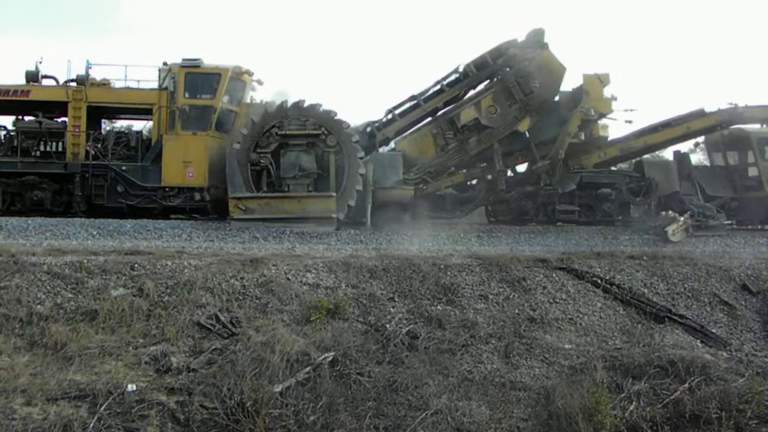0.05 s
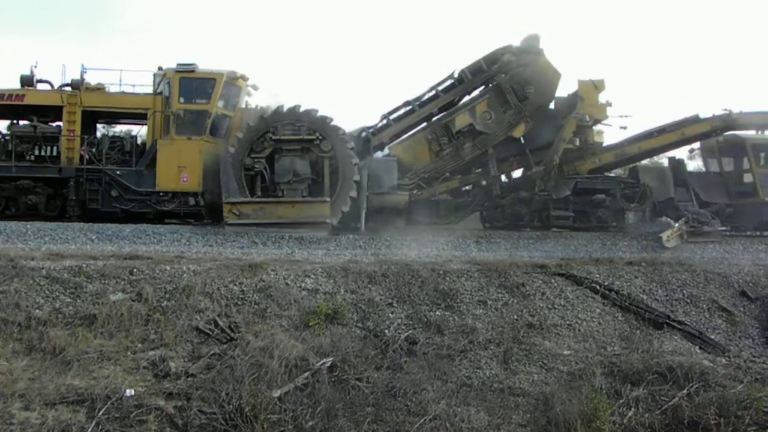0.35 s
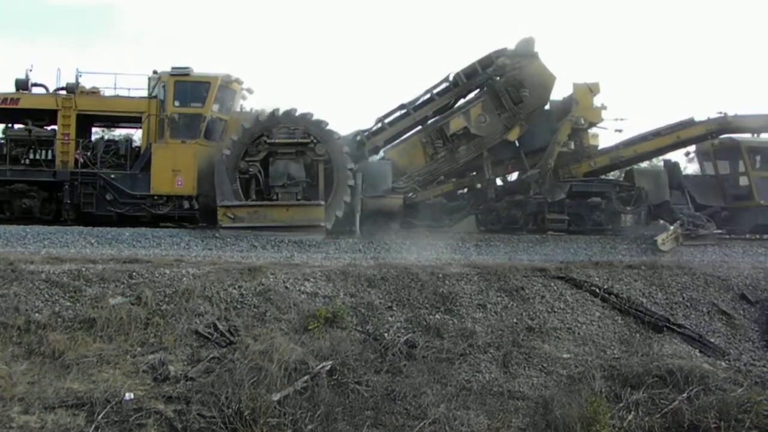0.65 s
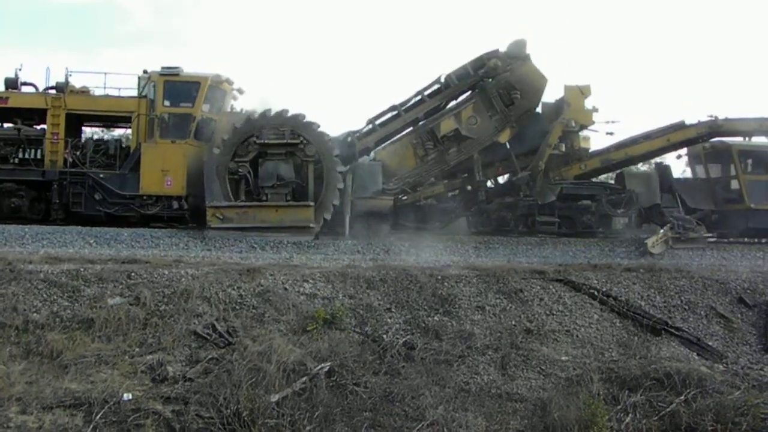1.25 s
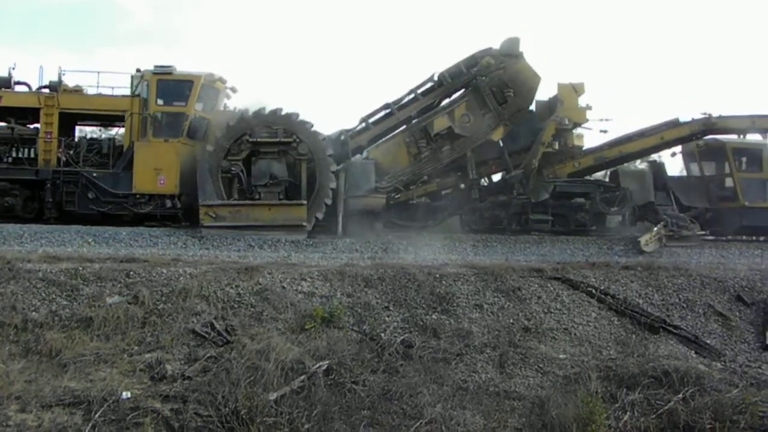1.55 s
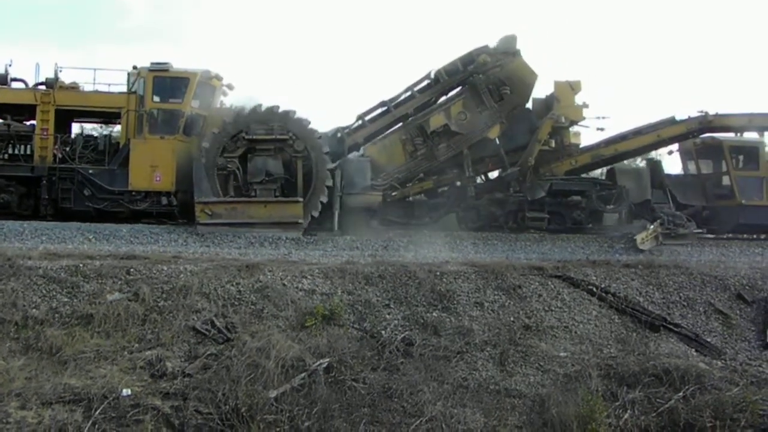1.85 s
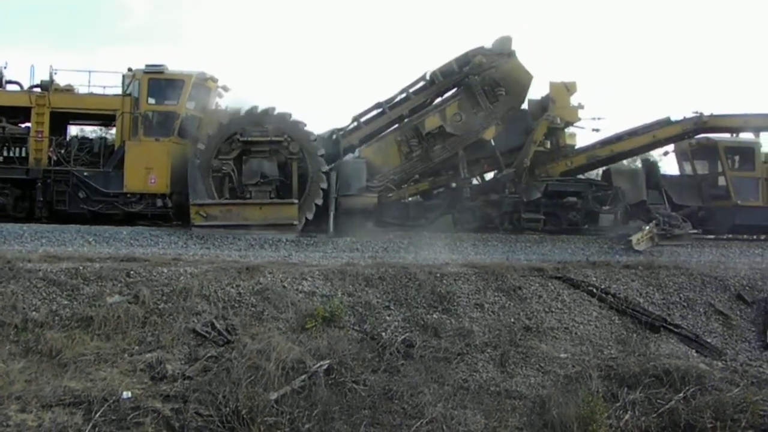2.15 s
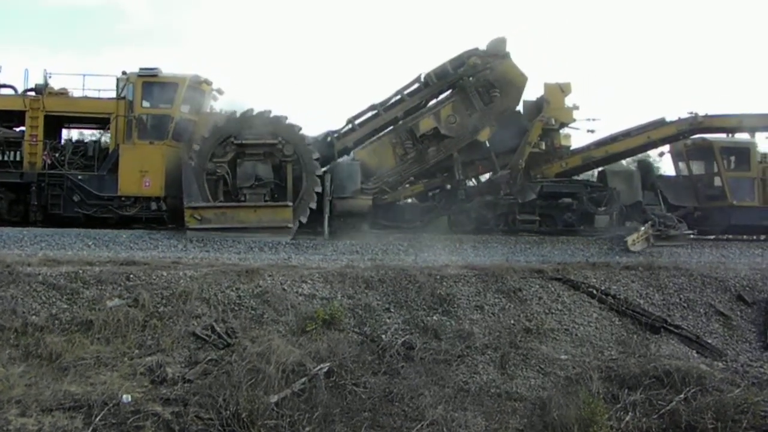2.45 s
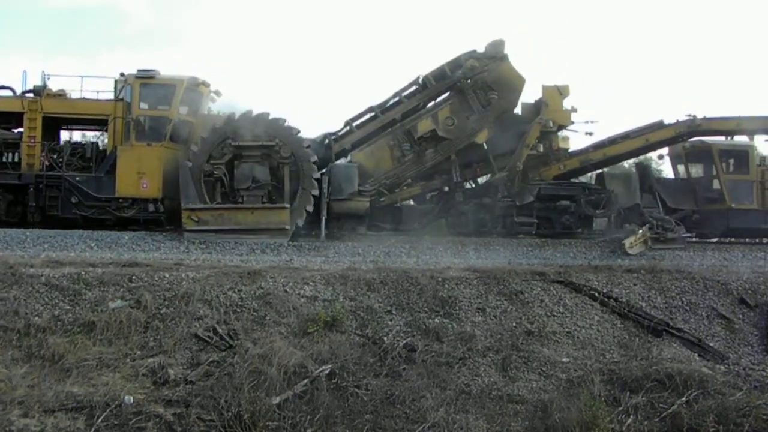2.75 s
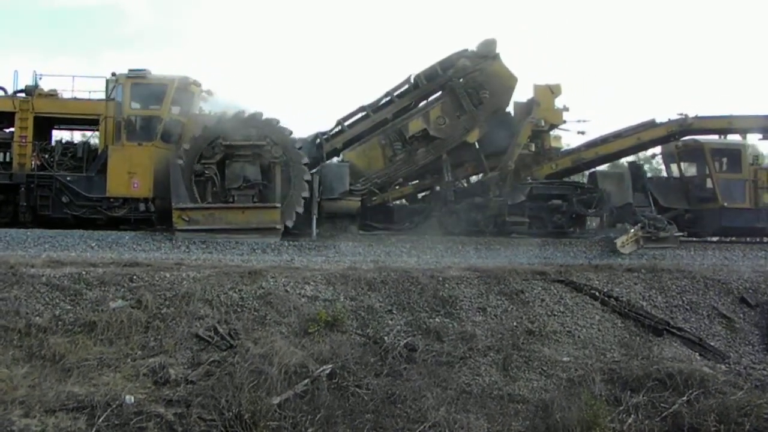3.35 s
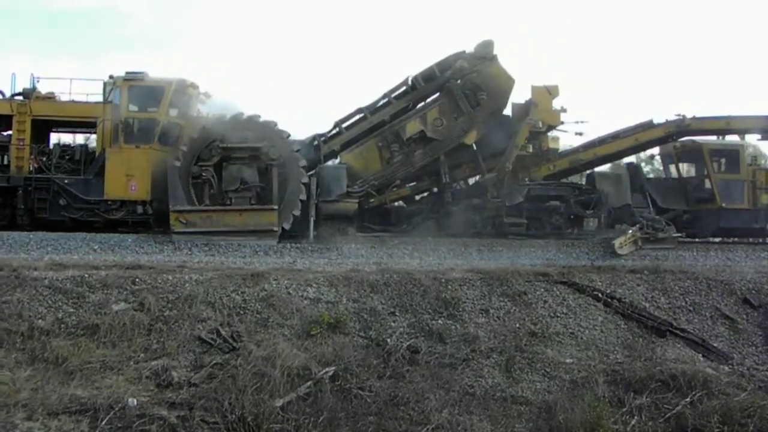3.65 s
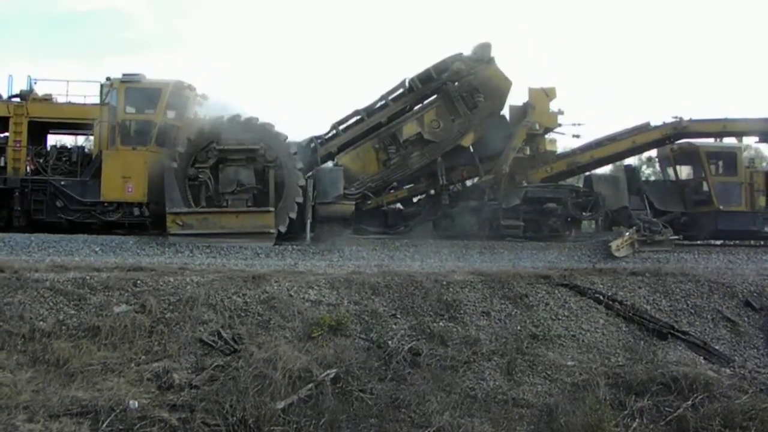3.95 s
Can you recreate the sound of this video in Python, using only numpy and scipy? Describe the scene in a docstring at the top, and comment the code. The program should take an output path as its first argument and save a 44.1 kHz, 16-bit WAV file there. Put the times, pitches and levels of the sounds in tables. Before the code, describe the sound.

A large track maintenance machine roars throughout, heard outdoors from a distance, with crushed stone rattling in rapid pulses over diesel rumble and a thin whine. Stones thud and clatter on steel at irregular moments. A sharp metal squeak cuts through at about 0.3 seconds, a few lower squeaks follow around 3 seconds, and faint, very high ones come and go. The machine keeps running through 4 seconds.

```python
"""A railway bank, heard from across a field, where a ballast cleaner is at work.
Diesels rumble, drives whine and conveyors roar, while a screen shakes crushed stone about
sixteen times a second into a pulsing rattle. On top, big stones thud and clatter on the steel,
and dry metal squeaks now and then as it sticks and slips."""
import sys
import numpy as np
from scipy import signal
from scipy.fft import rfft, irfft
from scipy.io import wavfile

SR = 44100
rng = np.random.default_rng(int(sys.argv[2]) if len(sys.argv) > 2 else 0)


def output_pcm(signal):
    """Save a mono or channel-first signal as 16-bit PCM at the path in sys.argv[1].

    Samples are clipped to [-1, 1] before scaling.
    """
    pcm = np.clip(np.atleast_2d(signal).T, -1, 1) * 32767
    wavfile.write(sys.argv[1], SR, np.round(pcm).astype(np.int16))


N = 176400
TIME = np.arange(N) / SR

# Tone of the diesel rumble: frequency_hz, level_db
DIESEL_SPECTRUM = [(15, -92), (35, -91), (55, -73), (84, -65), (108, -68.5), (145, -68.5), (170, -77),
                   (193, -101), (230, -79.5), (330, -82.5), (600, -88)]
# Swells and dips of that rumble: time_s, gain_db
DIESEL_SWELLS = [(0, -3), (.24, 5.5), (.36, -2.5), (1.05, 0), (1.25, -5), (1.58, 5), (1.66, -8), (1.73, 5),
                 (1.8, -4), (2.24, 2), (2.31, 5), (2.38, -9), (2.57, 1), (3.2, -1), (3.4, -7), (3.7, -1),
                 (4, -3)]
# Tone of the far-off low bed: frequency_hz, level_db
BED_SPECTRUM = [(15, -90), (170, -86), (198, -88), (225, -74), (270, -69), (330, -74.5), (600, -97)]
# Whining gears and pumps: pitch_hz, level_db, waver_hz
DRIVE_WHINES = [(246.6, -64, 3.05), (409.4, -46, 2.6), (923, -46, 2.7), (1725, -46, 3.5), (1837, -55, 4.2),
                (2300, -46, 3.2)]
# Tone of the conveyor roar: frequency_hz, level_db
CONVEYOR_SPECTRUM = [(220, -100), (335, -73), (385, -61), (470, -59.5), (620, -61.5), (750, -63),
                     (950, -59), (1130, -63.5), (1330, -61), (1500, -63.5), (1800, -61.5), (2300, -64),
                     (4000, -64), (8000, -78), (16000, -100)]
# Slow heave of that roar: time_s, gain_db
CONVEYOR_SWELLS = [(0, 2.5), (.2, 0), (.9, -0.3), (1.2, .6), (1.48, 1), (1.7, -0.5), (2.1, 0.2), (2.7, -.5),
                   (3.05, -1.4), (3.55, -0.5), (4, -0.1)]
# Tone of crushed stone on the screen: frequency_hz, level_db
STONE_SPECTRUM = [(300, -80), (1000, -69.5), (2300, -63), (2700, -58.5), (3050, -57.5), (3500, -60.5),
                  (4200, -60), (5000, -57.5), (5900, -55.5), (6800, -56), (8600, -63), (9700, -69),
                  (12000, -74.5), (13500, -80.5), (15700, -85)]
# Loads of stone hitting steel: peak_s, centre_hz, width_octaves, level_db, swell_s
STONE_HITS = [(.31, 565, 0.68, -28, 0.028), (.574, 2350, 0.29, -23, 0.0087), (.578, 5000, .7, -22, .012),
              (0.767, 5800, .5, -24, 0.027), (0.837, 2840, .2, -24.5, 0.0083),
              (1.232, 960, 0.13, -28, 0.0078), (1.531, 3130, 0.14, -24, 0.0072),
              (1.557, 620, 0.93, -30.5, 0.023), (1.96, 720, 0.86, -30, 0.026),
              (2.246, 467, 0.56, -27.5, 0.017), (2.355, 5500, 0.33, -23.5, 0.0065),
              (2.685, 5200, .5, -19, .011), (3.24, 800, 0.85, -30, 0.038), (3.318, 5560, 0.45, -17, 0.0038),
              (3.892, 700, 0.36, -30.5, .022)]
# Dry metal squeaks: start_s, length_s, pitch_hz, level_db, glide_ratio (pitch change over pitch)
METAL_SQUEAKS = [(0.318, 0.031, 6610, -6.5, .012), (.445, .035, 12550, -35, 0), (.705, .03, 12450, -37, 0),
                 (.755, .04, 13100, -30, -.025), (1.015, .025, 13500, -41, 0), (2.33, .03, 11850, -33, 0),
                 (2.85, 0.081, 3100, -24, -.005), (2.91, 0.12, 3020, -27.5, -.015),
                 (3.056, 0.056, 2690, -23.5, -0.006), (3.28, .03, 13820, -36, 0),
                 (3.574, .028, 12000, -25, -0.0073), (3.908, 0.032, 13280, -30, -.01),
                 (3.972, .05, 13550, -28, .05)]


def amp(db):
    """Decibels to gain."""
    return 10 ** (np.asarray(db) / 20)


def unit(x):
    """Scales to rms 1."""
    return x / np.sqrt(np.mean(x ** 2) + 1e-20)


def fader(points):
    """Rides the gain along points of time_s, gain_db."""
    return amp(np.interp(TIME, *np.transpose(points)))


def colour(x, spectrum):
    """Gives white sound of rms 1 a spectrum in dB per Hz."""
    hz, db = np.transpose(spectrum)
    curve_db = np.interp(np.log(np.fft.rfftfreq(N, 1 / SR) + 1), np.log(hz), db)
    return irfft(rfft(x) * amp(curve_db), N) * np.sqrt(SR / 2)


def drift(rate_hz):
    """Random wander of rms 1, mostly slower than rate_hz."""
    rolloff = 1 + (np.fft.rfftfreq(N, 1 / SR) / rate_hz) ** 4
    return unit(irfft(rfft(rng.standard_normal(N)) / rolloff, N))


def patchy_noise(patch_db, patch_hz, patch_s):
    """White noise that swells in random patches of time and pitch."""
    frames = signal.stft(rng.standard_normal(N), nperseg=512, noverlap=384)[2]
    across_pitch = np.fft.fftfreq(frames.shape[0], SR / 512)[:, None]
    along_time = np.fft.fftfreq(frames.shape[1], 128 / SR)
    blur = np.exp(-(across_pitch * patch_hz) ** 2 - (along_time * patch_s) ** 2)
    patches = np.fft.ifft2(np.fft.fft2(rng.standard_normal(frames.shape)) * blur).real
    return unit(signal.istft(frames * amp(patch_db * unit(patches)), nperseg=512, noverlap=384)[1][:N])


def diesel_rumble():
    """The diesels lay a lumpy low end over an even bed of far-off noise."""
    rumble = colour(rng.standard_normal(N), DIESEL_SPECTRUM) * fader(DIESEL_SWELLS)
    return rumble + colour(rng.standard_normal(N), BED_SPECTRUM)


def drive_whine():
    """Gears and pumps sing pure tones that waver in pitch and level."""
    out = np.zeros(N)
    for pitch_hz, level_db, waver_hz in DRIVE_WHINES:
        gain = amp(level_db + 1.2 * drift(rate_hz=5.8)) * np.sqrt(2)
        wavering_hz = pitch_hz + waver_hz * drift(rate_hz=8.2)
        out += gain * np.sin(2 * np.pi * np.cumsum(wavering_hz) / SR)
    return out


def conveyor_roar():
    """Stone tumbles through wheel, belts and chutes in a churning roar."""
    churn = patchy_noise(patch_db=0.77, patch_hz=696, patch_s=0.05)
    return colour(churn, CONVEYOR_SPECTRUM) * fader(CONVEYOR_SWELLS)


def shaking_screen(shake_hz=15.71, first_shake_s=0.0106, clicks_per_s=6000, click_share=0.37):
    """Each stroke of the screen throws the stone: a surge of tiny clicks in a gritty wash."""
    stroke = 2 * np.pi * shake_hz * (TIME - first_shake_s)
    surge_db = np.cos(stroke) + 0.32 * np.cos(2 * stroke)  # the harmonic sharpens each throw
    surge_db *= 1 + 0.26 * drift(rate_hz=9.6)  # no two strokes alike
    size_db = 2.5 * np.minimum(rng.exponential(1, N), 4)
    polarity = rng.choice([-1, 1], N)
    clicks = unit(amp(size_db) * polarity * (rng.random(N) < clicks_per_s / SR))
    wash = patchy_noise(patch_db=1.5, patch_hz=500, patch_s=0.025)
    stones = np.sqrt(click_share) * clicks + np.sqrt(1 - click_share) * wash
    return colour(stones * amp(surge_db + 0.15 * drift(rate_hz=6.7)), STONE_SPECTRUM)


def stone_hits(low_cut_hz=350):
    """Each load excites one band of the steelwork: a short clatter that swells and dies."""
    octaves = np.log2(np.fft.rfftfreq(N, 1 / SR) + 1)
    out = np.zeros(N)
    for peak_s, centre_hz, width_octaves, level_db, swell_s in STONE_HITS:
        band = np.exp(-0.5 * ((octaves - np.log2(centre_hz)) / width_octaves) ** 2)
        clatter = unit(irfft(rfft(rng.standard_normal(N)) * band, N))
        swell = np.exp(-0.5 * ((TIME - peak_s) / swell_s) ** 2)
        out += amp(level_db) * swell * clatter
    return signal.sosfilt(signal.butter(6, low_cut_hz, "high", fs=SR, output="sos"), out)


def metal_squeaks(attack_s=0.007):
    """Steel sticks and slips: short tones, most of them gliding, the thin high ones less steady."""
    out = np.zeros(N)
    for start_s, length_s, pitch_hz, level_db, glide_ratio in METAL_SQUEAKS:
        progress = np.clip((TIME - start_s) / length_s, 0, 1)
        jitter = (0.0088 if pitch_hz > 10000 else 0.0025) * drift(rate_hz=280)
        sliding_hz = pitch_hz * (1 + glide_ratio * (progress - 0.5) + jitter)
        envelope = np.clip((TIME - start_s) / attack_s, 0, 1) * np.cos(np.pi * progress / 2)
        out += amp(level_db) * envelope * np.sin(2 * np.pi * np.cumsum(sliding_hz) / SR)
    return out


def scene():
    """The distant machine sits dead centre, alike in both channels."""
    machine = diesel_rumble() + drive_whine() + conveyor_roar() + shaking_screen()
    machine += stone_hits() + metal_squeaks()
    return np.array([machine, machine])


def record(dry):
    """A microphone notch, a limiter that ducks fast and recovers slowly, then a steep high cut."""
    notch_hz, notch_width_hz, high_cut_hz = 7865, 1060, 15720
    limit_db, recover_db_per_s = -14.5, 38
    offset_hz = np.fft.rfftfreq(N, 1 / SR) - notch_hz
    notched = irfft(rfft(dry) * offset_hz / (offset_hz - 0.5j * notch_width_hz), N)
    power = signal.lfilter(np.ones(256) / 256, 1, (notched ** 2).mean(0))
    over_db = np.maximum(10 * np.log10(power + 1e-12) - limit_db, 0)
    recovery_db = TIME * recover_db_per_s
    duck_db = np.maximum.accumulate(over_db + recovery_db) - recovery_db
    high_cut = signal.firwin(1023, high_cut_hz, window=("kaiser", 9), fs=SR)
    return signal.oaconvolve(notched / amp(duck_db), high_cut[None], "same")


dry = scene()
out = record(dry)
output_pcm(out)
```